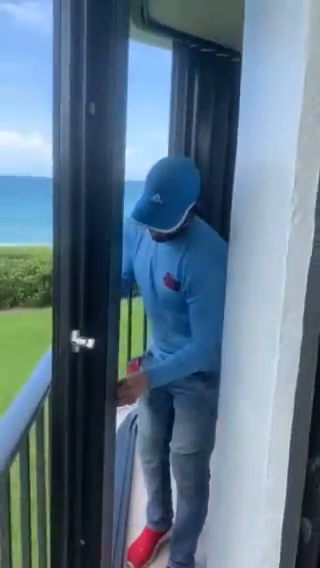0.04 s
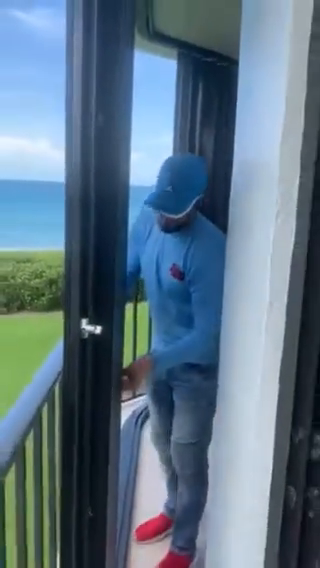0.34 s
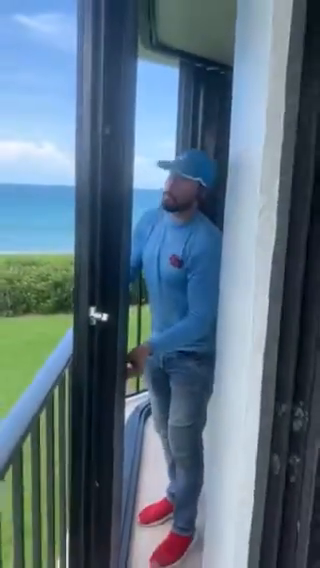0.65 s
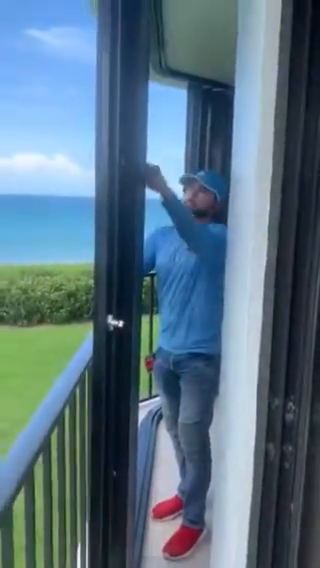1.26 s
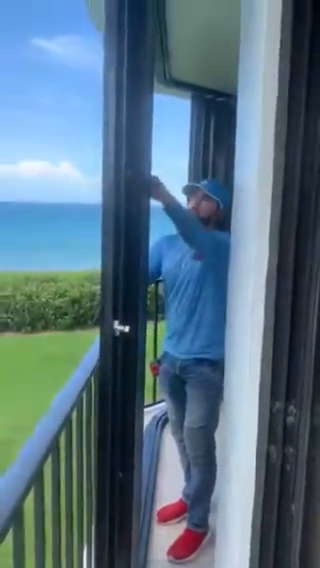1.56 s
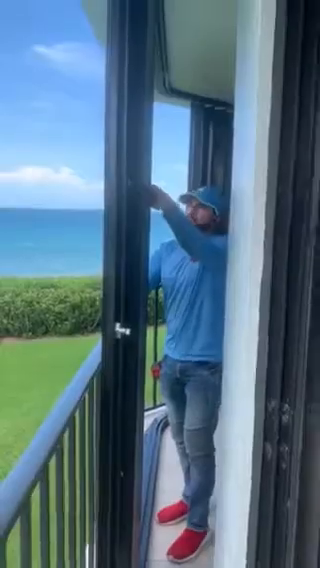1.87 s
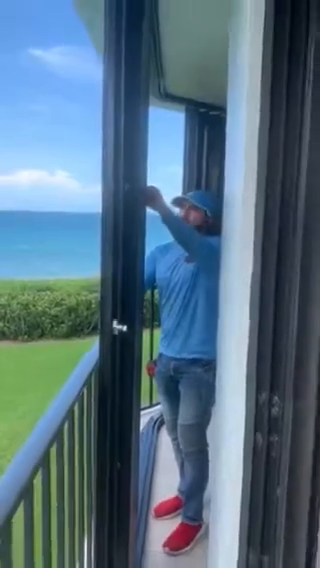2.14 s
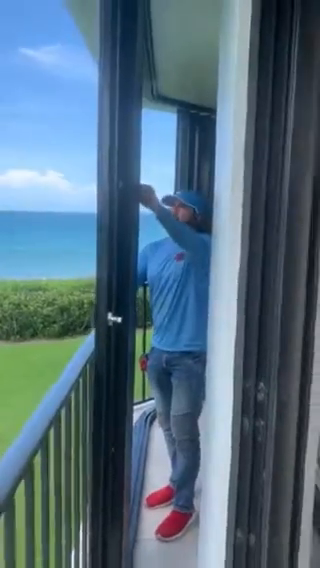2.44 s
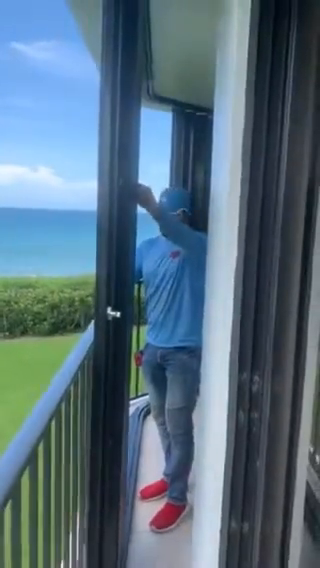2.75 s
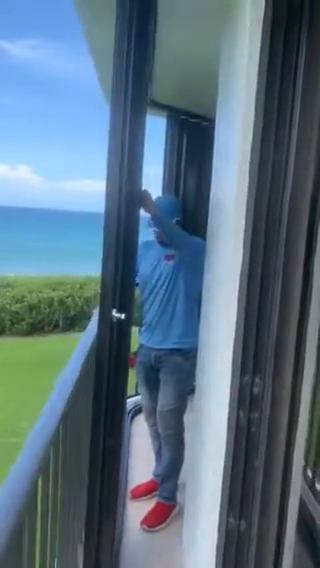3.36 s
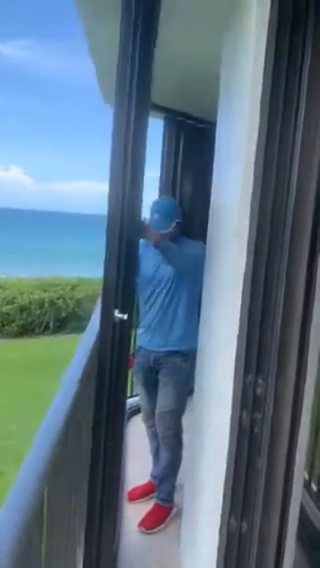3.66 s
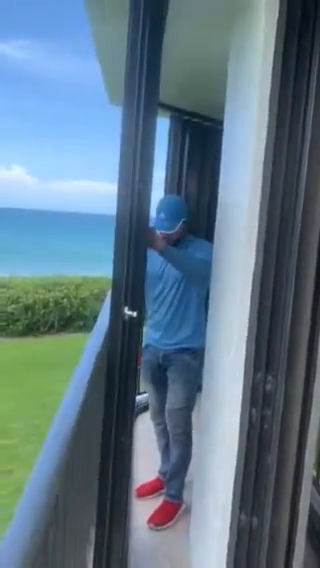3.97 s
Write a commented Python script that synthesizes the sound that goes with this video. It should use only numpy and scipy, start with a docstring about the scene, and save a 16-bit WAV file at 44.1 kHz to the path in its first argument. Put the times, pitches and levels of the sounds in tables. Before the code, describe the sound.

Scattered hollow clicks and knocks come from a metal shutter being handled on a balcony, building to one loud clatter that rings briefly. Underneath, a breeze rumbles on the microphone and distant surf washes softly.

```python
"""Clicks and knocks come from a folding metal storm shutter, worked by hand on a seaside balcony.
Its slats and lock pins chatter, each knock with a short hollow note. Then the panel gives with
a loud clatter that sets the slats ringing, and the panels and walls ring on after the hits.
Wind rumbles and buffets on the microphone; surf, a soft hiss and a faint whistle lie behind."""
import sys
import numpy as np
from scipy import signal
from scipy.fft import rfft, irfft
from scipy.io import wavfile
from scipy.ndimage import uniform_filter1d

SR = 44100
rng = np.random.default_rng(int(sys.argv[2]) if len(sys.argv) > 2 else 0)


def output_pcm(signal):
    """Save a mono or channel-first signal as 16-bit PCM at the path in sys.argv[1].

    Samples are clipped to [-1, 1] before scaling.
    """
    pcm = np.clip(np.atleast_2d(signal).T, -1, 1) * 32767
    wavfile.write(sys.argv[1], SR, np.round(pcm).astype(np.int16))


N = 176400
TIME = np.arange(N) / SR

# Light knocks of slats and pins. Each row: start in seconds, midrange level in dB,
# treble and very high treble in dB compared with that level, pitch of the hollow note in Hz.
LIGHT_KNOCKS = [(0.017,-30.5,-5,-24,1423), (0.047,-24.5,-7,-39,1010), (0.08,-34.5,-5.5,-37,1086),
                (0.204,-29,-2,-33,1290), (0.283,-33,-13,-31.5,1386), (0.445,-35,-3,-58,1204),
                (0.491,-29,-3,-34.5,1428), (0.851,-38,-13.5,-26,1316), (1.396,-55,6,-13,1317),
                (1.506,-36,-12.5,-39,1000), (1.74,-33,-7,-43,1552), (1.823,-33,-4.5,-23,1135),
                (1.857,-32.5,-9.5,-34,1110), (1.983,-36,-17,-42,1616), (2.046,-37.5,-9.5,-37,1235),
                (2.091,-35,-5,-38,1654), (2.142,-35,-11,-40,1310), (2.182,-32.5,0.5,-27,1786),
                (2.705,-36.5,-12,-33,1087), (2.855,-30.5,2.5,-19.5,1309), (2.921,-39,-14,-40,1365),
                (3.02,-29,-12,-31,1386), (3.137,-35,2,-17,1584), (3.191,-32.5,-4,-36,1347),
                (3.289,-32.5,-3,-30,1305), (3.31,-36,0,-33,790), (3.406,-23,-4.5,-18,1140),
                (3.423,-26,-6,-40,1578), (3.91,-36,-9.5,-48.5,957)]
KNOCK_RISE_S = 0.0049


def shutter():
    """Loose metal knocks lightly, then heavy blows and scrapes shake the whole panel."""
    # Each row: start in seconds, midrange level in dB, treble and very high treble in dB
    # compared with that level, seconds to fade to about a third.
    heavy_blows = [(3.128,-35,-4.5,-28,0.13), (3.289,-28.5,-25,-30,0.031), (3.49,-29.5,-6,-22,0.042),
                   (3.518,-25,7.5,-9,0.031), (3.528,-17,7,-7.5,0.0063), (3.556,-20.5,3,-9,0.026),
                   (3.572,-17.5,1.5,-38,0.018), (3.618,-18.5,0,-16,0.026), (3.646,-20,-1.5,-44,0.014),
                   (3.716,-34.5,-3.5,-37,0.058)]
    # The tone of a knock and of a blow. Each row: frequency in Hz, level in dB.
    knock_colour = [(150, -4), (350, -5), (620, -13), (930, 1), (1400, 0), (1850, -2), (2450, -8),
                    (3300, 2), (4600, -5.5), (6300, -6.5), (9000, -21), (12500, -33), (15500, -18.5)]
    blow_colour = [(150, -11), (300, -5), (420, -2.5), (540, -10.5), (680, -1.5), (1000, 1), (1550, 1),
                   (2000, -5), (2450, -12), (3300, -0.5), (6800, -7.5), (9000, -12.5), (12800, -13),
                   (15500, -6)]
    knocks = contacts(LIGHT_KNOCKS, knock_colour, rise_s=KNOCK_RISE_S, fade_s=0.017, mid_db=-3.5)
    blows = contacts(heavy_blows, blow_colour, rise_s=0.0029, fade_s=[row[-1] for row in heavy_blows])
    hits = from_db(3.5) * knocks + blows
    return hits + after_ring(hits) + hollow_notes() + ringing_slats()


def contacts(rows, colour, rise_s, fade_s, mid_db=0, size=8192):
    """Each contact is a brief, uneven chatter of loose metal, coloured by the place it strikes."""
    out = np.zeros(N)
    t, hz = np.arange(size) / SR, np.fft.rfftfreq(size, 1 / SR)
    tone = from_db(at_hz(colour, hz))
    bands_hz = [(800, 2200), (2800, 8000), (10000, 16000)]   # midrange, treble, very high treble
    tone_db = np.array([10 * np.log10(np.mean(tone ** 2 * (hz > lo) * (hz < hi))) for lo, hi in bands_hz])
    for (start, db, treble_db, top_db, _), fade in zip(rows, np.broadcast_to(fade_s, len(rows))):
        band_gains_db = np.array([mid_db, treble_db, top_db]) - tone_db
        balance_db = np.interp(hz, np.ravel(bands_hz), np.repeat(band_gains_db, 2))
        white = rng.standard_normal(size)
        flicker_db = 1.5 * np.clip(rng.standard_normal(size // 32), -2, 2)
        chatter = rms_one(white * from_db(np.repeat(flicker_db, 32)))
        envelope = np.minimum(t / rise_s, 1) * np.exp(-np.maximum(t - rise_s, 0) / fade)
        gain = tone * from_db(db + balance_db + struck_point(hz))
        add(out, start, causal_filter(chatter * envelope, gain))
    return out


def struck_point(hz):
    """Each place on the panel favours its own frequencies: random peaks and dips, in dB."""
    grid_hz = np.arange(0, SR / 2, 90)
    ripple_db = 2.2 * np.interp(hz, grid_hz, np.clip(rng.standard_normal(len(grid_hz)), -2, 2))
    average_power = uniform_filter1d(from_db(ripple_db) ** 2, size=250)
    return ripple_db - 10 * np.log10(average_power)


def ringing_slats():
    """A hard blow rings the slats' natural notes, most strongly those near its own pitch."""
    # The natural notes. Each row: pitch in Hz, level in dB, seconds to fade by 60 dB.
    slat_notes = [(403,4,.6), (705,-5,.75), (742,-3.5,.85), (828,-4,.8), (879,3,.85), (974,-6,.7),
                  (1287,-2,.8), (2705,-10,.29), (2781,-6,.27), (2851,-1,.29), (3258,-8,.3), (4309,0,.14),
                  (4430,-4,.17), (4701,-7,.3), (4855,-9,.25), (6589,2,.17), (8646,3,.13)]
    # The hardest blows. Each row: start in seconds, level in dB, pitch in Hz.
    clangs = [(3.521, -22, 744), (3.528, -12, 5220), (3.555, -15.5, 2700)]
    out = np.zeros(N)
    for start, db, blow_hz in clangs:
        for hz, note_db, ring_s in slat_notes:
            octaves_away = np.log2(hz / blow_hz)
            add(out, start, from_db(db + note_db - 14.5 * octaves_away ** 2) * ring(hz, ring_s))
    return out


def hollow_notes():
    """The hollow slat answers each knock with a short note and one higher, softer overtone."""
    out = np.zeros(N)
    swell = np.minimum(TIME[:SR] / KNOCK_RISE_S, 1)
    for start, db, _, _, hz in LIGHT_KNOCKS:
        note = ring(hz, ring_s=0.096)
        overtone = from_db(-4.5) * ring(hz * 1.23, ring_s=0.096)
        add(out, start, from_db(db + 4) * swell * (note + overtone))
    return out


def after_ring(hits):
    """The joined panels and the walls ring on after each hit, dying faster in the treble."""
    # The lingering sound. Each row: frequency in Hz, level in dB, seconds to fade by 60 dB.
    tail_bands = [(199, -0.5, 0.6), (880, -4, 0.71), (1700, 2, 0.47), (3300, -9.5, 0.52),
                  (6500, -6.5, 0.35), (15000, -14, 0.46)]
    t, hz = TIME[:SR], np.fft.rfftfreq(SR, 1 / SR)
    white = rfft(rng.standard_normal(SR))
    swell = 1 - np.exp(-t / 0.0017)
    edges_hz = np.geomspace(100, 18000, 16)
    tail = np.zeros(SR)
    for lo, hi in zip(edges_hz, edges_hz[1:]):
        centre = np.sqrt(lo * hi)
        band = irfft(white * (hz >= lo) * (hz < hi), SR)
        envelope = swell * np.exp(-np.log(1000) * t / at_hz(tail_bands, centre, column=2))
        tail += band * envelope / np.linalg.norm(envelope) * from_db(at_hz(tail_bands, centre))
    return signal.fftconvolve(hits, tail)[:N]


def wind():
    """A breeze rumbles on the microphone's opening; buffets rise suddenly out of it."""
    # The breeze. Each row: time in seconds, level in dB.
    breeze = [(0, -33), (1.0, -31), (1.45, -39), (1.75, -29.5), (2.35, -41.5), (2.7, -35.5), (3.1, -43.5),
              (4, -44)]
    # The buffets. Each row: start in seconds, length in seconds, level in dB.
    gusts = [(0, 0.09, -23), (0.32, 0.15, -24.5), (0.627, 0.11, -28), (1.84, 0.23, -27),
             (2.022, 0.026, -19), (2.453, 0.051, -23.5), (2.598, 0.23, -32)]
    # The deep tone of both. Each row: frequency in Hz, level in dB.
    rumble = [(14, -15.5), (45, 1.5), (115, -6), (170, -15.5), (900, -72)]
    push, edge_s = np.zeros(N), 0.0061
    for start, length, db in gusts:
        inside_s = np.minimum(TIME - start, start + length - TIME)
        push += from_db(db) * np.clip(inside_s / edge_s + 0.5, 0, 1)
    return level(breeze) * noise(rumble) + push * noise(rumble)


def surf():
    """Distant surf makes an even wash of noise."""
    # Its tone. Each row: frequency in Hz, level in dB.
    surf_colour = [(230, 1.5), (1700, -5.5), (2400, -14.5), (6800, -22), (8500, -35), (11000, -51),
                   (15500, -45)]
    return from_db(-42.5) * noise(surf_colour)


def hiss():
    """A soft, sliding hiss swells and sinks."""
    # Its loudness. Each row: time in seconds, level in dB.
    hiss_levels = [(1.1, -63), (1.27, -52), (1.45, -63), (2.0, -59.5), (2.42, -45), (2.8, -48), (3.0, -60)]
    # Its tone. Each row: frequency in Hz, level in dB.
    hiss_colour = [(1200, 4.5), (3000, 3), (8000, 1), (10500, -15.5), (12900, -14), (15000, 0)]
    return level(hiss_levels) * noise(hiss_colour)


def whistle(pitch_hz=2988):
    """A thin, faint whistle holds one pitch and swells twice near the start."""
    # Its loudness. Each row: time in seconds, level in dB.
    whistle_levels = [(0.1, -59), (.43, -53.5), (.7, -63), (.89, -52.5), (1.2, -65)]
    return level(whistle_levels) * np.sin(2 * np.pi * pitch_hz * TIME)


def from_db(db):
    """Turn decibels into a number to multiply by."""
    return 10 ** (np.asarray(db) / 20)


def rms_one(x):
    """Scale a sound to an average power of 1."""
    return x / np.sqrt(np.mean(x ** 2) + 1e-20)


def level(rows):
    """Join (seconds, dB) points into a volume curve."""
    return from_db(np.interp(TIME, *np.transpose(rows)))


def at_hz(rows, hz, column=1):
    """Read a table between its rows, with frequency spaced in octaves."""
    table = np.array(rows)
    return np.interp(np.log(np.maximum(hz, 1)), np.log(table[:, 0]), table[:, column])


def noise(colour):
    """Noise of power 1, its tone shaped by (Hz, dB) points."""
    gain = from_db(at_hz(colour, np.fft.rfftfreq(N, 1 / SR)))
    return rms_one(irfft(rfft(rng.standard_normal(N)) * gain, N))


def causal_filter(x, gain):
    """Shape the tone so that nothing sounds before its cause (a minimum-phase filter)."""
    cepstrum = irfft(np.log(gain + 1e-9))
    half = len(cepstrum) // 2
    cepstrum[1:half] *= 2
    cepstrum[half + 1:] = 0
    return irfft(rfft(x) * np.exp(rfft(cepstrum)))


def ring(hz, ring_s):
    """One second of a struck note: a sine wave that fades by 60 dB in ring_s seconds."""
    t = TIME[:SR]
    return np.sin(2 * np.pi * hz * t) * np.exp(-np.log(1000) * t / ring_s)


def add(track, start_s, sound):
    """Mix a sound into a track at a given time."""
    start = int(np.clip(start_s * SR, 0, N - 1))
    track[start:start + len(sound)] += sound[:N - start]


def scene():
    """Shutter, wind and seaside air meet at one microphone."""
    return (shutter() + wind() + surf() + hiss() + whistle())[None]


def record(dry):
    """Round off the tallest peaks, then cut the highest treble."""
    ceiling, cutoff_hz = 1.02, 16500
    rounded = dry / (1 + (dry / ceiling) ** 6) ** (1 / 6)
    treble_cut = signal.cheby2(16, 60, cutoff_hz, fs=SR, output="sos")
    return signal.sosfiltfilt(treble_cut, rounded, padlen=2000)


dry = scene()
out = record(dry)
output_pcm(out)
```